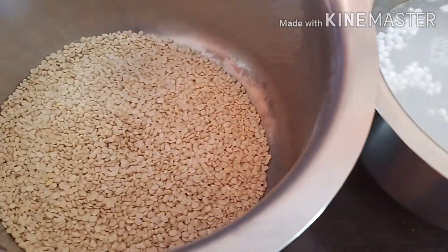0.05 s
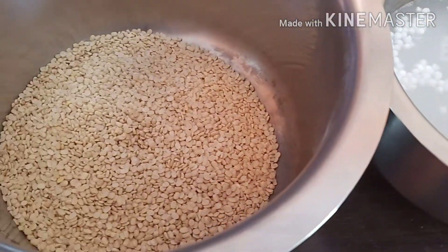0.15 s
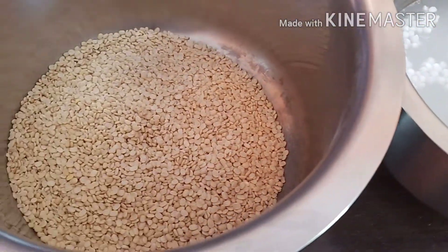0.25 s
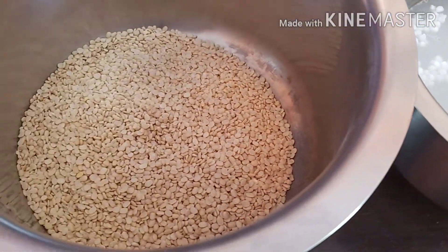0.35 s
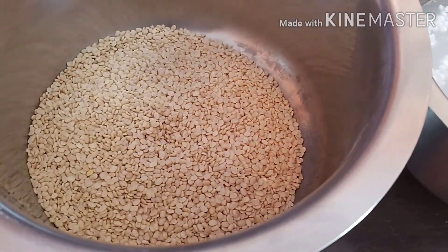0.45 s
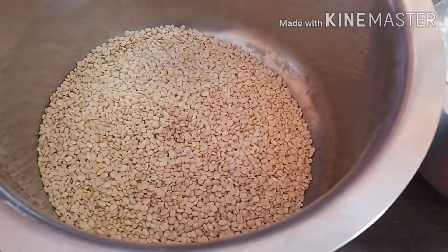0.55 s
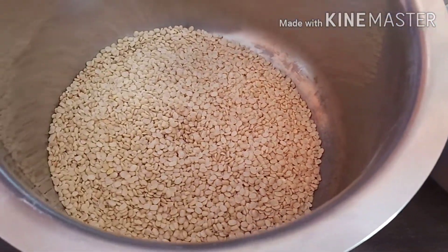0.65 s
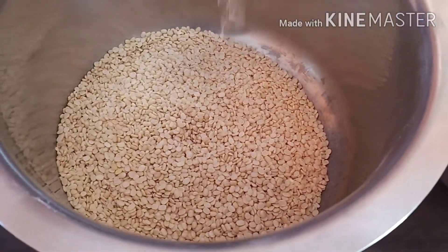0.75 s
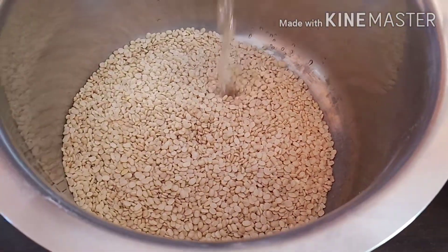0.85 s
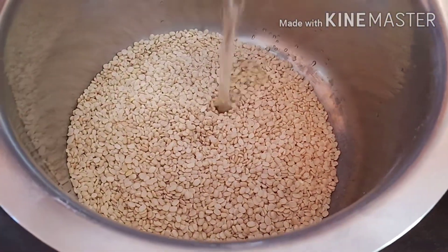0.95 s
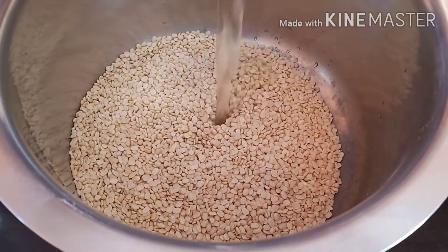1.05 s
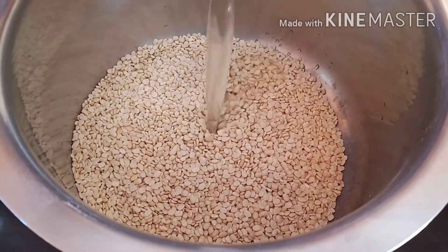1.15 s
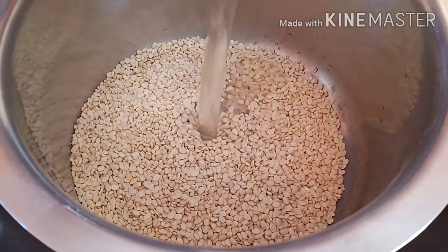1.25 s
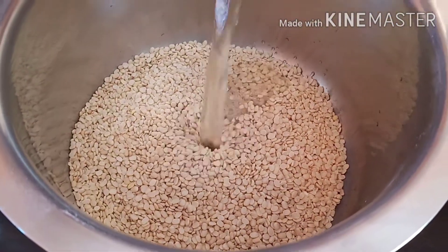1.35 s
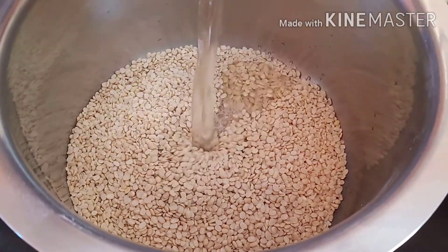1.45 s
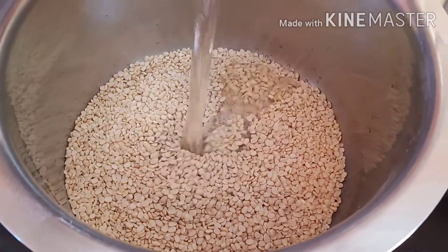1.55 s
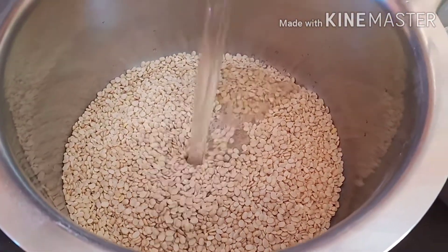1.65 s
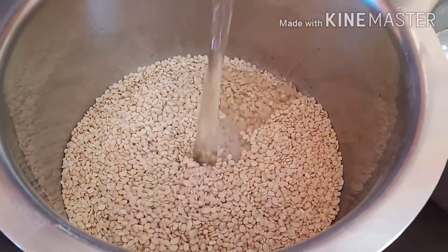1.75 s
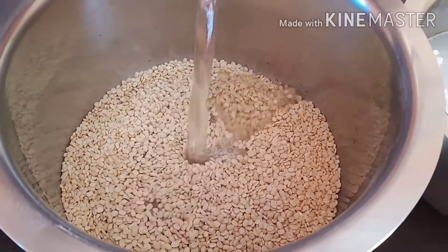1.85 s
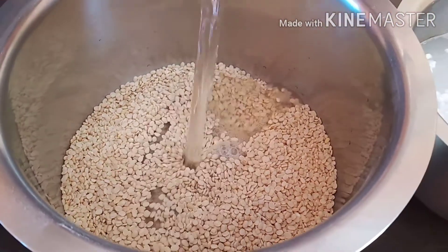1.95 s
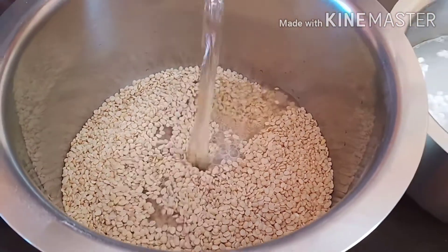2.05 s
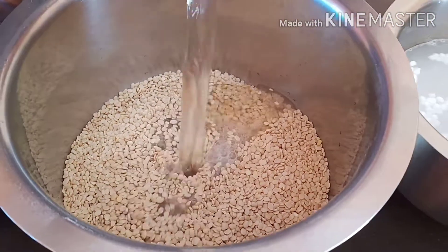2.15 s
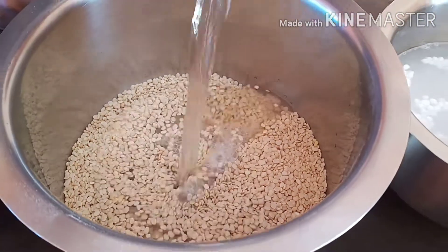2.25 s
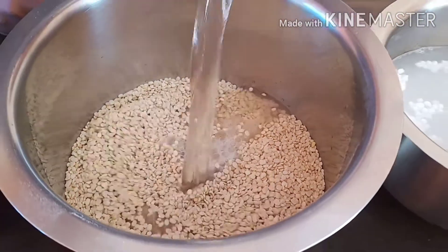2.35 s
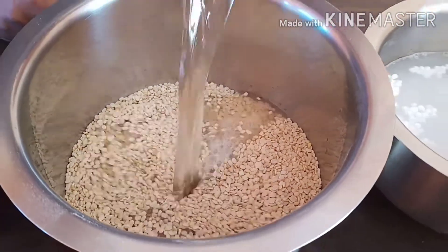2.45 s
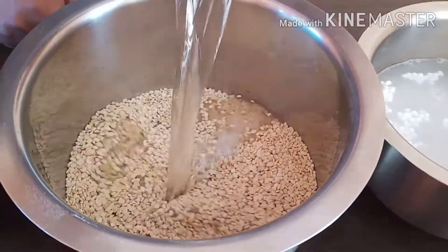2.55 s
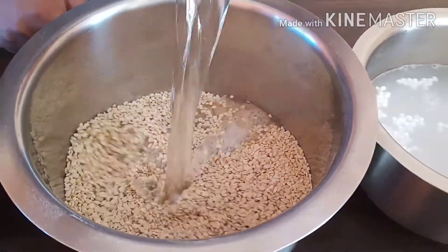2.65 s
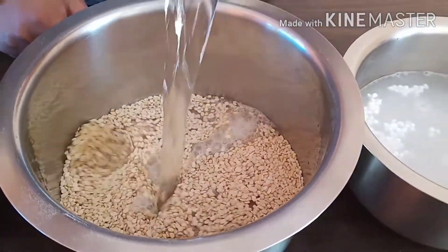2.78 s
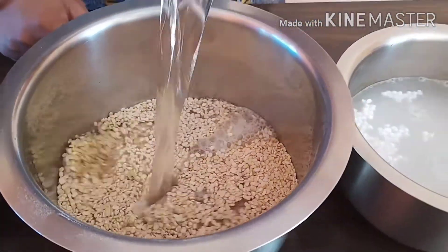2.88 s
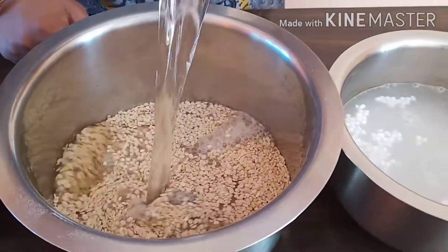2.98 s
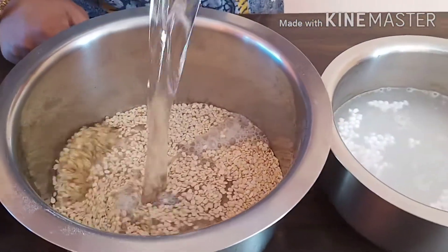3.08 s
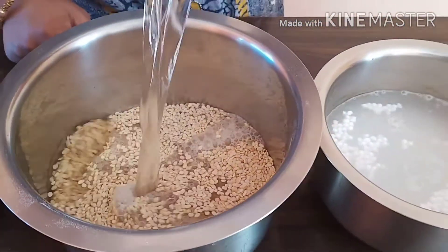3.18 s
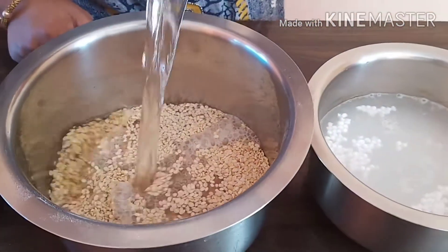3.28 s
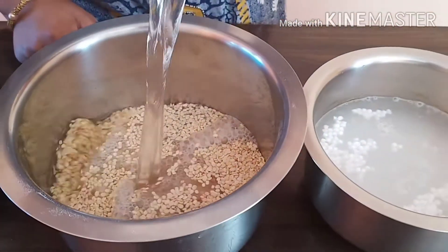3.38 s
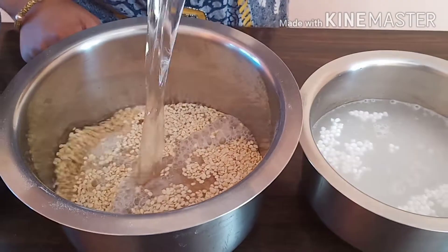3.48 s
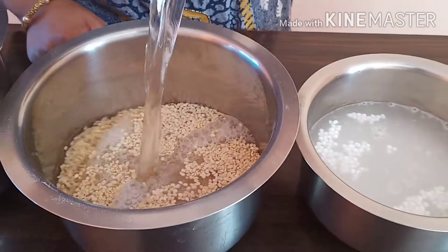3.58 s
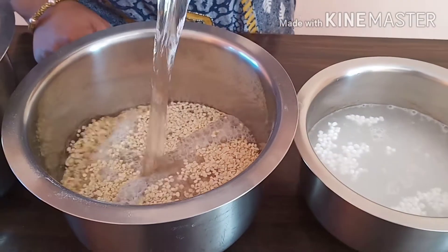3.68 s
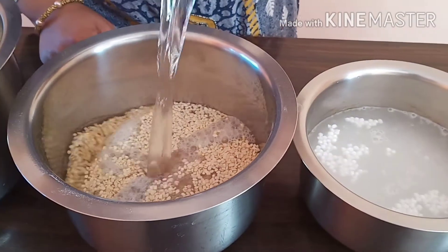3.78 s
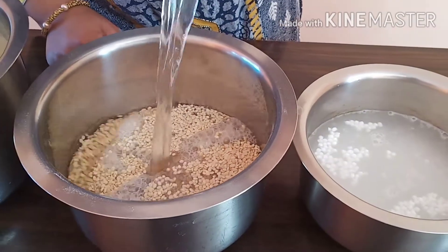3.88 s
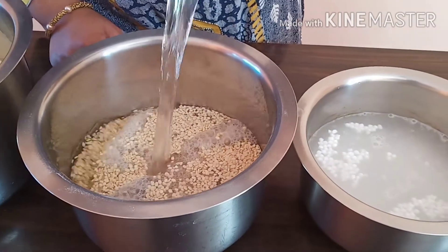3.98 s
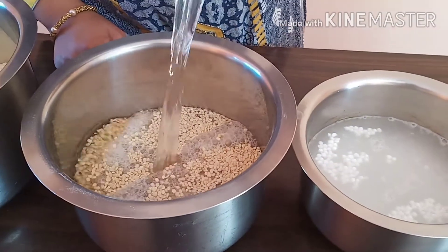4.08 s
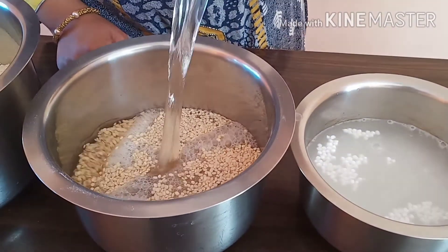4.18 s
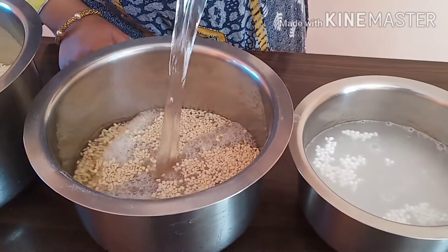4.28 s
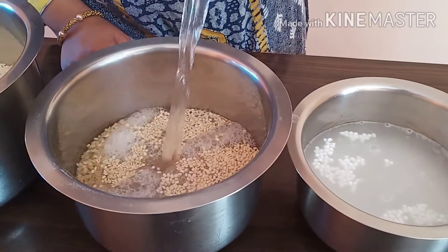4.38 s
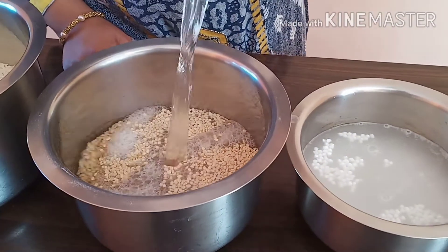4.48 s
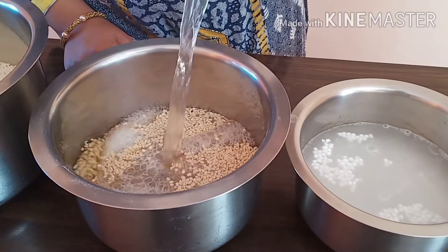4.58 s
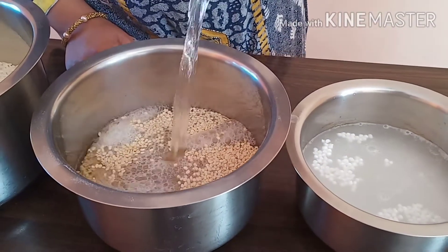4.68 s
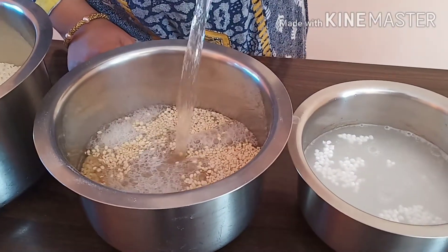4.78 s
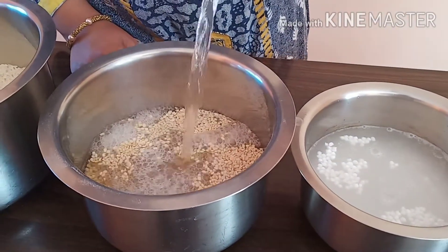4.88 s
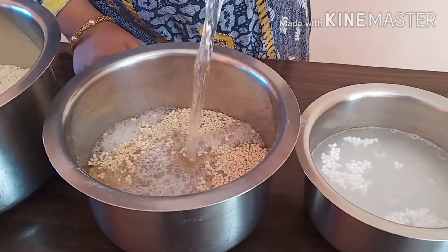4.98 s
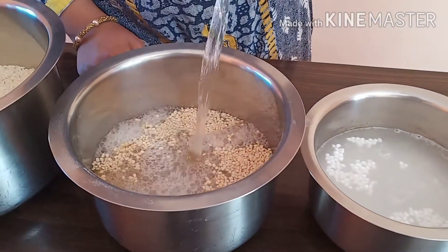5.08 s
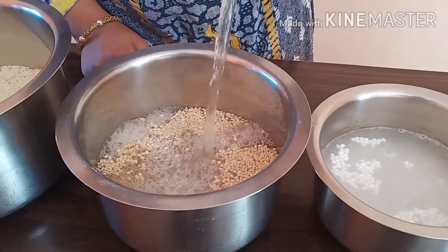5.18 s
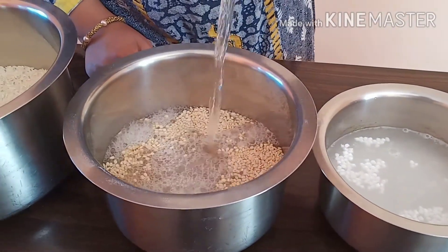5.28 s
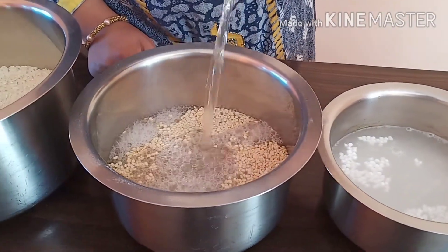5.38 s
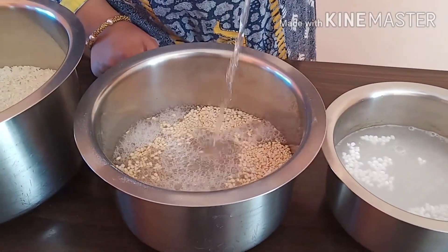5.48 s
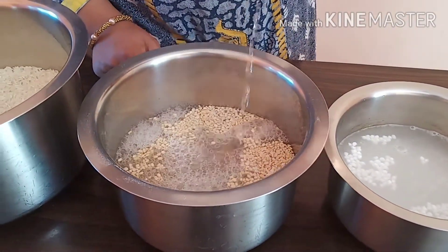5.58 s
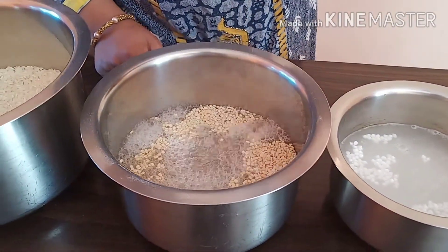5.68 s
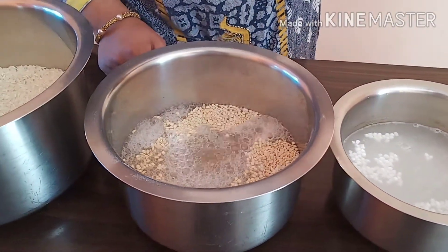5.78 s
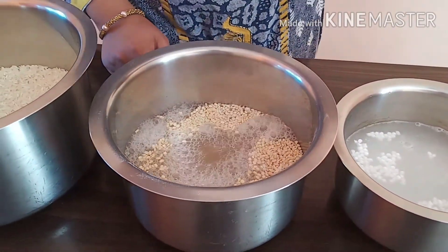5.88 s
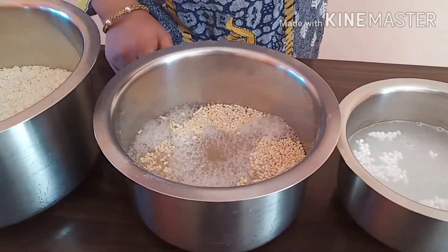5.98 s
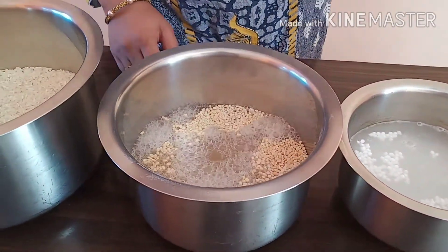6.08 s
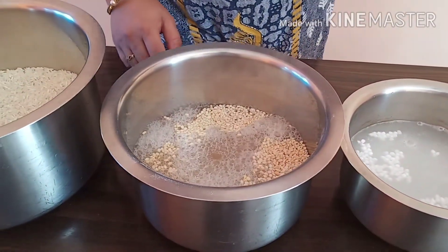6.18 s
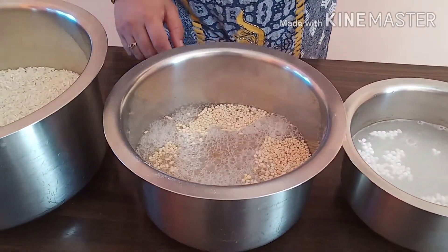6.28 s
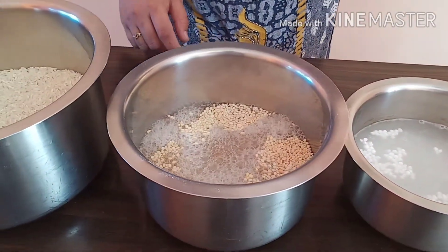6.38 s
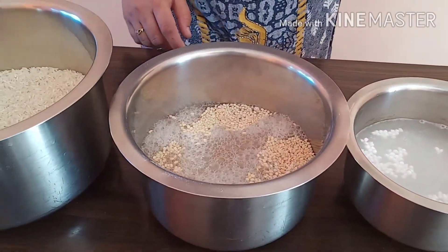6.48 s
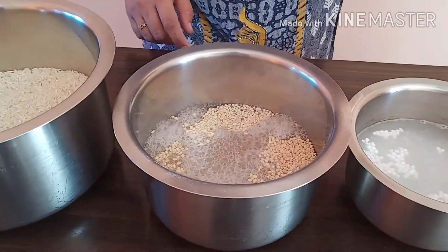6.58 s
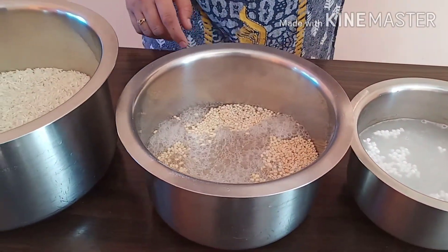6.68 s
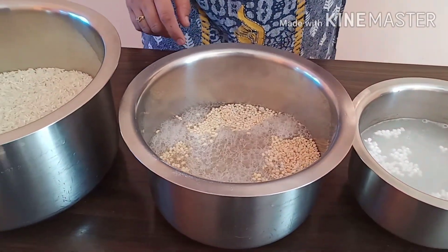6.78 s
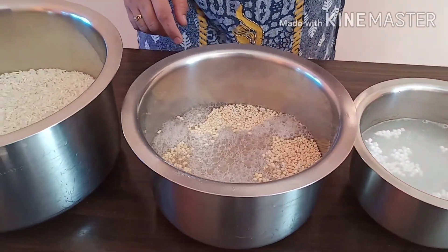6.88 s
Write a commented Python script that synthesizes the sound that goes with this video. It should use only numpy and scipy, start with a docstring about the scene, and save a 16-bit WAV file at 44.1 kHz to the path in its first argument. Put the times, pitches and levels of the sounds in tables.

```python
"""The first drops spatter and rattle dry lentils, then a stream of water hisses and rings the air in the pot.
As a pool forms the hiss softens and bubbles gurgle; the stream thins and breaks, and the wet lentils tick.
The steel pot is heard in close stereo in a quiet kitchen. Spray, splash and rattle are random impacts with wall
echoes, bubbles are damped tones that glide up, the pot's air and pockets are knocked resonances of moving
pitch, drops are short noise cracks, and the kitchen is a wavering hiss with a short reverberation."""
import sys
import numpy as np
from scipy import signal
from scipy.fft import rfft, irfft, next_fast_len
from scipy.io import wavfile
from scipy.ndimage import uniform_filter1d, map_coordinates

SR = 44100
rng = np.random.default_rng(int(sys.argv[2]) if len(sys.argv) > 2 else 0)


def to_wav(s):
    """Save 16-bit WAV."""
    ch = np.atleast_2d(s).T  # columns
    pcm = np.round(np.clip(ch, -1, 1) * 32767)  # PCM
    wavfile.write(sys.argv[1], SR, pcm.astype(np.int16))


N = 305820
TIME = np.arange(N) / SR  # s

# the water's timeline [s]: the gate opens and is shut again
START, END = .809, 5.88
# the grains are wetted, the stream is full, the pool covers the lentils, the stream stops
WETTED_S, FULL_S, COVERED_S, STOP_S = 0.97, 1.01, 3.33, 5.672
# air pockets form once the pool is deep enough
POCKETS_S = 2.9

# glugs, where the stream drags air under:
# (time [s], length [s], level of the air in the pot [dB], level of the air pockets [dB])
GLUGS = [(1.053, .06, -49, -73), (1.6, .13, -48, -71), (2.252, 0.045, -48, -59), (2.796, .17, -44, -67),
         (3.071, .04, -48, -58.5), (3.367, .05, -46, -57.5), (3.57, .13, -52, -52),
         (4.041, .05, -49.5, -52.5), (4.806, .06, -45.5, -56.5), (5.132, .04, -48, -64),
         (5.32, .06, -41.5, -53.5), (5.46, 0.21, -47, -53)]


def amp(db):
    """Decibels to gain."""
    return 10 ** (np.asarray(db) / 20)


def unit(x):
    """Scale to an rms of 1."""
    return x / np.sqrt(np.mean(x ** 2) + 1e-20)


def along(points, hz):
    """Each column of a table of frequencies, read on a log axis."""
    f, *cols = np.transpose(points)
    return np.array([np.interp(np.log(hz + 1), np.log(f + 1), c) for c in cols])


def curves(rows):
    """One value per sample for each column after the time."""
    s, *cols = np.transpose(rows)
    return [np.interp(TIME, s, c) for c in cols]


def ramp(start, length):
    """Rises from 0 to 1 over a length of time."""
    return np.clip((TIME - start) / length, 0, 1)


def since(s):
    """Seconds gone by after a moment, 0 before it."""
    return np.maximum(TIME - s, 0)


def during():
    """A gate that is open while the water runs."""
    return ramp(START, .004) * np.clip((END - TIME) / .1, 0, 1)


def wobble(rate):
    """A smooth random curve, rate knots a second."""
    knots = np.arange(0, N * rate / SR + 1, .1)
    heights = rng.standard_normal(int(N * rate / SR) + 4)
    return np.interp(TIME * rate, knots, map_coordinates(heights, [knots]))


def filtered(x, response):
    """x times a response of frequency."""
    m = next_fast_len(N + SR // 4, True)
    return irfft(rfft(x, m) * response(np.fft.rfftfreq(m, 1 / SR)), m)[..., :N]


def coloured(x, spectrum):
    """x through a causal, minimum-phase filter with the given spectrum."""
    size = 4096
    cepstrum = irfft(np.log(amp(along(spectrum, np.fft.rfftfreq(size, 1 / SR)))))
    # folding the cepstrum forward makes the response start at once
    cepstrum[:, 1:size // 2] *= 2
    cepstrum[:, size // 2 + 1:] = 0
    response = irfft(np.exp(rfft(cepstrum)))
    return signal.fftconvolve(x, response, axes=1)[:, :N]


def ports(pair):
    """Two unrelated signals become a stereo pair that is alike in the bass."""
    # (frequency [Hz], left-right likeness [0-1])
    likeness = [(100, 1), (300, 0.98), (650, 0.87), (1400, 0.079), (3000, 0.026)]

    def turn(hz):
        return np.arcsin(np.clip(along(likeness, hz), 0, 1)) / 2

    own = filtered(pair, lambda hz: np.cos(turn(hz)))
    crossed = filtered(pair[::-1], lambda hz: np.sin(turn(hz)))
    return own + crossed


def panned(db):
    """Left and right gains for a level difference; positive leans left."""
    return amp(np.array([db, -db]).reshape(2, -1) / 2)


def add(track, s, sound):
    """Mix a sound into a track at a time."""
    part = track[..., round(s * SR):][..., :sound.shape[-1]]
    part += sound[..., :part.shape[-1]]


def impacts(rate, spread_db):
    """Random impulses of uneven size, rate a second, at a steady power."""
    size = amp(spread_db * np.clip(rng.standard_normal(N), -2.5, 2.5))
    struck = rng.random(N) < rate / SR
    sign = rng.choice([-1, 1], N)
    return unit(struck * sign * size / np.sqrt(rate))


def pot(x, t60, direct):
    """Each impact reaches the ports straight and as its own blur of bounces between the steel walls."""
    keep = amp(-120 / (t60 * SR))  # per sample; it acts on power, so t60 [s] is the fall by 60 dB
    power = uniform_filter1d(signal.lfilter([1 - keep], [1, -keep], x ** 2), size=64)
    bounces = np.sqrt(np.abs(power)) * rng.standard_normal((2, N))
    return unit(np.reshape(direct, (2, 1)) * x + bounces)


def gulp(hz, cycles, rise, attack):
    """A damped tone that glides up as the bubble nears the surface; cycles until it is 60 dB down."""
    t = np.arange(int(SR * cycles / hz)) / SR
    age = t * hz / cycles
    phase = 2 * np.pi * hz * np.cumsum(1 + rise * age) / SR
    tone = np.sin(phase) * amp(-60 * age) * (1 - np.exp(-t * hz / attack))
    return tone / np.abs(tone).max()


def bubbles(centre_hz, octaves, cycles, spread_db, count):
    """A swarm of short rising notes of random size; each meets the two ports with its own strength and phase."""
    start = rng.integers(0, N, (count, 1))
    pitch, size, side, turn = np.clip(rng.standard_normal((count, 4)), -2, 2).T[..., None]
    step = np.arange(int(min(SR * cycles / centre_hz, 700)))
    age = step / SR * centre_hz * 2 ** (octaves * pitch) / cycles
    phase = 2 * np.pi * cycles * age * (1 + 0.074 * age)
    shape = amp(spread_db * size) * amp(-50 * age) * (1 - step / len(step))
    left = shape * np.cos(side) * np.sin(phase)
    right = shape * np.sin(side) * np.sin(phase + turn)
    places = (start + step).ravel()
    return unit(np.array([np.bincount(places, n.ravel(), N)[:N] for n in (left, right)]))


def resonance(hz_curve, half_width_hz, rate):
    """Random knocks ring one resonance whose pitch moves; stereo, rms 1."""
    def lowpass(hz):
        return 1 / (1 + 1.41j * hz / half_width_hz - (hz / half_width_hz) ** 2)

    knocks = np.array([impacts(rate, spread_db=3.0) for _ in range(2)])
    ring = filtered(np.vstack([knocks, rng.standard_normal((2, N))]), lowpass)
    # the slow swings are carried up to the moving pitch
    phase = 2 * np.pi * np.cumsum(hz_curve) / SR
    mid, side = ring[::2] * np.cos(phase) + ring[1::2] * np.sin(phase)
    return unit(np.array([mid + 0.25 * side, mid - 0.39 * side]))


def patchy(x, depth_db, width_hz, life):
    """Loudness drifts in random patches of frequency and time (life in s)."""
    z = signal.stft(x, nperseg=512)[2]
    field = rng.standard_normal(z.shape[1:])
    bins, frames = width_hz * 512 / SR, life * SR / 256
    for axis, steps in enumerate([bins, frames]):
        field = signal.lfilter([1], [1, -np.exp(-1 / steps)], field, axis=axis)
    return unit(signal.istft(z * amp(depth_db * unit(field)), nperseg=512)[1][:, :N])


def kitchen():
    """A background hiss whose middle band wavers."""
    # spectrum of the hiss: (frequency [Hz], left [dB], right [dB])
    room_spectrum = [(25, -50, -44), (50, -26, -28), (89, -5.5, -5.5), (400, -10, -10), (820, -16, -17.5),
                     (1090, 0.5, -2), (2420, 0.5, -12.5), (3920, -3, -16), (5180, -17, -15), (5050, -3, -8),
                     (7030, -3.5, -4), (8340, -19, -16), (9250, -51, -18.5), (11400, -30.5, -33)]
    # change of the middle band: (time [s], level [dB])
    middle_levels = [(0, -1), (.22, 1), (.7, -1), (6.05, -5.5), (6.23, -2.5), (6.42, -5.5)]
    quiet_db = -53
    hiss = unit(coloured(ports(rng.standard_normal((2, N))), room_spectrum))
    middle = filtered(hiss, lambda hz: np.exp(-(np.log((hz + 1) / 2100) / .9) ** 4))
    middle_db = curves(middle_levels)[0] + 1.3 * wobble(14)
    hiss = hiss + middle * (amp(middle_db) - 1)
    return patchy(hiss, depth_db=3.5, width_hz=88, life=0.041) * amp(quiet_db)


def walls(x, t60):
    """The kitchen's short reverberation: a decaying noise tail that starts after 8 ms."""
    t = np.arange(SR // 2) / SR
    tail = rng.standard_normal((2, len(t))) * amp(-60 * t / t60) * (t > .008)
    return ports(signal.fftconvolve(x, tail / np.linalg.norm(tail[0]), axes=1)[:, :N])


def rustles():
    """Soft swells of tiny bright clicks, before and after the pour."""
    # (time [s], level [dB], half length [s])
    swells = [(.52, -73, .025), (6.77, -61, .035)]
    swell = sum(amp(db) * np.exp(-((TIME - s) / half) ** 2) for s, db, half in swells)
    grains = pot(impacts(1500, spread_db=3), t60=.01, direct=[.5, 1])
    return swell * unit(filtered(grains, lambda hz: np.clip((hz - 6000) / 6000, 0, 1)))


def soaking():
    """Tiny bubbles between the wet lentils fizz faintly far right, from the stream's break-up onward."""
    pops = pot(impacts(400, spread_db=4), t60=.012, direct=[.5, 1])
    fizzing = unit(filtered(pops, lambda hz: np.exp(-((hz - 8750) / 1700) ** 2)))
    return fizzing * panned(-22.5) * amp(-74.5) * ramp(5.5, 0.17)


def base():
    """The pot's base drums in its modes, harder once the stream breaks into blobs; surges of water thump it."""
    # modes of the loaded base: (frequency [Hz], width [Hz], level [dB])
    base_modes = [(75, 13, 0), (124, 17, -2), (206.4, 11, 2)]
    # surges: (time [s], level [dB], starting pitch [Hz])
    surges = [(0.807, -49, 150), (0.963, -46, 119), (0.992, -40, 120), (1.0, -45, 194), (1.147, -42, 124),
              (1.854, -54, 117), (2.265, -44, 200), (3.79, -46.5, 221), (4.211, -45.5, 118),
              (5.172, -50, 80), (5.587, -46, 211)]
    smooth_db, blobs_db, fade_db_per_s = -70, 14, 200  # smooth stream; extra under blobs; after the stop
    break_s = 5.5

    def modes(hz):
        total = 0
        for k, (centre, width, db) in enumerate(base_modes):
            peak = 1j * hz * width / (centre * centre - hz * hz + 1j * hz * width)
            total = total + (-1) ** k * amp(db) * peak  # neighbours have opposite sign
        return total

    drum_db = smooth_db + blobs_db * ramp(break_s, .2) - fade_db_per_s * since(STOP_S)
    drum = unit(filtered(impacts(70, spread_db=6.5), modes)) * amp(drum_db) * during()
    for s, db, hz in surges:
        add(drum, s, amp(db - 3.5) * gulp(hz, cycles=17, rise=0.11, attack=1.2))
    return drum


def glugging():
    """Each glug swells, holds and dies away: gains of the air in the pot and of the air pockets."""
    attack_s, fall_db_per_s = 0.0097, 144

    def swell(s, length):
        return ramp(s - attack_s / 2, attack_s) * amp(-fall_db_per_s * since(s + length))

    swells = np.array([swell(s, length) for s, length, *_ in GLUGS])
    return amp([row[2:] for row in GLUGS]).T @ swells


def hollow():
    """The splashing rings the air in the pot, harder at each glug; the pitch wavers most while the pool spreads."""
    # the pitch shifts as the pool spreads: (time [s], pitch [Hz])
    air_pitch = [(2.9, 622.5), (4.05, 597.3), (4.5, 778.4), (5.15, 771), (5.4, 722.6)]
    steady_db, fade_db_per_s = -52.5, 62  # between glugs; after the stream stops
    centre_hz, = curves(air_pitch)
    # share by which the pitch wanders
    sloshing = np.interp(TIME, [2.8, 3.6, 4.4, 4.9], [0.0306, 0.0996, .1, 0.045])
    air = resonance(centre_hz * (1 + sloshing * wobble(22)), half_width_hz=43, rate=220)
    steady = amp(steady_db - fade_db_per_s * since(STOP_S)) * ramp(WETTED_S, 0.055)
    return air * np.hypot(steady, glugging()[0]) * amp(-1.5 + 0.57 * wobble(20)) * during()


def pocket_hz(s):
    """Pitch of the air pockets at a time: it sags as the pool deepens."""
    return 524.5 - 72 * (s - POCKETS_S)


def pool():
    """Churning air pockets, a few plops of random size in each glug, and single loud gulps."""
    # the loudest bubbles and early patter: (time [s], level [dB], starting pitch [Hz])
    loud_bubbles = [(0.923, -34, 1320), (0.981, -29.5, 1330), (2.255, -31.5, 586), (2.953, -31, 660),
                    (3.11, -30, 558), (3.581, -32, 637), (4.053, -34, 593), (4.078, -41, 449),
                    (4.212, -35, 619), (4.311, -36.5, 590), (4.842, -25, 760), (4.864, -40.5, 390),
                    (4.952, -33, 780), (5.07, -44, 417), (5.165, -26, 761), (5.379, -41.5, 241),
                    (5.389, -40, 335), (5.453, -32, 765), (5.525, -30, 719), (5.59, -32.5, 674),
                    (5.63, -43, 339), (5.665, -31.5, 800)]
    lag_s = .025  # a pocket rings just after the plunge
    churn = resonance(pocket_hz(TIME) * (1 + .06 * wobble(16)), half_width_hz=55, rate=170)
    steady = amp(-71.5) * ramp(POCKETS_S, 0.12)
    gulps = np.zeros(N)
    for s, length, _, db in GLUGS:
        for when, size in rng.random((3, 2)):
            # larger plops are lower
            plop = gulp(pocket_hz(s) * 2 ** (.15 - 0.33 * size), cycles=27, rise=.06, attack=1.5)
            add(gulps, s + lag_s + when * length, amp(db - 0.5) * plop)
    for s, db, hz in loud_bubbles:
        add(gulps, s, amp(db - 4.5) * gulp(hz, cycles=28.6, rise=0.039, attack=2.1))
    pockets = np.interp(TIME - lag_s, TIME, glugging()[1])
    return churn * np.hypot(steady, pockets) * during() * panned(3.0) + gulps


def fizz():
    """Middle-sized bubbles gurgle in the pool, louder as it fills and at every glug."""
    full_db, grows_db, fade_db_per_s = -50.5, 13, 130  # in the full pool; gained while it fills; after the stop
    fill_s = 2.15
    swarm = bubbles(centre_hz=1290, octaves=0.45, cycles=105, spread_db=2.0, count=3500)
    steady_db = full_db - grows_db * (1 - ramp(FULL_S, fill_s)) - fade_db_per_s * since(STOP_S)
    gain = np.hypot(amp(steady_db), amp(0.5) * glugging()[1])
    return unit(ports(swarm)) * gain * amp(1.7 * wobble(9)) * during()


def pouring():
    """Levels of spray and splash: a trickle builds to the full stream, then a quick fade, spray first."""
    # the steady stream: (time [s], spray level [dB], splash level [dB])
    stream_levels = [(1.07, -28, -35), (1.24, -27.5, -36), (1.35, -26.5, -33), (2.36, -28, -34.5),
                     (2.48, -30, -33.5), (2.58, -28.5, -32), (3.04, -31.5, -33.5), (3.36, -30, -33.5),
                     (3.53, -38, -36.5), (4.59, -38, -41), (5.4, -45, -43.5), (5.44, -46, -45)]
    trickle_spray_db, trickle_splash_db = -8.5, -11  # the first trickle against the full stream
    spray_fade, splash_fade = 230, 106  # dB per s after the stream stops
    spray_db, splash_db = curves(stream_levels)
    spray_db = spray_db + trickle_spray_db * (1 - ramp(WETTED_S, 0.043)) - spray_fade * since(STOP_S)
    splash_db = splash_db + trickle_splash_db * (1 - ramp(START, 0.16)) - splash_fade * since(STOP_S)
    return spray_db, splash_db


def plinks():
    """Small bubbles ring out singly in the open pool."""
    swarm = bubbles(centre_hz=2362, octaves=0.248, cycles=92, spread_db=4, count=700)
    level_db = pouring()[1] - 6
    return swarm * amp(level_db) * ramp(COVERED_S, .4) * during()


def rattle():
    """Dry lentils click against each other in a narrow bright band, ever louder until they are wetted."""
    centre_hz, width_hz = 7600, 1400
    peak_db, rise_db_per_s, fall_db_per_s = -23, 85, 400

    def band(hz):
        return (1j * hz * width_hz / (centre_hz ** 2 - hz ** 2 + 1j * hz * width_hz)) ** 2

    grains = unit(filtered(pot(impacts(1700, spread_db=9), t60=0.032, direct=[.3, 1]), band))
    level_db = peak_db - rise_db_per_s * np.maximum(WETTED_S - TIME, 0) - fall_db_per_s * since(WETTED_S)
    return grains * amp(level_db) * panned(-5) * during()


def clicks(rows, t60, gain_db):
    """Sharp little noise cracks with a short rattle of wall echoes."""
    # a drop's crack: (frequency [Hz], left [dB], right [dB])
    crack_spectrum = [(304,-31,-44.5), (1510,-39,-39), (4230,-15,-9), (5500,-14,-22), (7200,-7,3.5),
                      (10000,-16,-6.5), (11900,-22,-12.5), (15100,-13,-11)]
    track, t = np.zeros((2, N)), np.arange(SR // 25) / SR
    shape = amp(-60 * t / t60) + amp(-22 - 60 * t / 0.043)  # crack, then echoes
    for s, db, pan_db in rows:
        noise = rng.standard_normal((2, len(t)))
        add(track, s, amp(db + gain_db) * panned(pan_db) * shape * noise)
    return coloured(track, crack_spectrum)


def spatter(count):
    """Stray drops of random strength and place, all through the full stream."""
    when, strength, place = rng.random((count, 3)).T
    times = FULL_S + when * (STOP_S - FULL_S)
    level_db = np.interp(times, [FULL_S, STOP_S], [-19, -24]) - 9 * strength
    return clicks(zip(times, level_db, -12 * place), t60=0.0067, gain_db=2)


def drops():
    """Loud drops smack on lentils and steel, lentils tick as they shift and settle, stray drops spatter."""
    # the loudest drops: (time [s], level [dB], left-right [dB])
    smacks = [(0.8213, -14.5, -18.5), (0.8368, -16, -16), (0.8438, -18.5, -13), (0.8656, -8, -17),
              (0.873, -13, -8.5), (0.887, -16.5, -19), (0.9052, -10.5, -6), (0.92, -10, -12),
              (0.9615, -19, -12), (1.1668, -6, 5), (3.2172, -6, 1), (3.3426, -11.5, -7), (3.7294, -19, -13),
              (3.7957, -18, -4), (3.9784, -19, -11), (4.1998, -12, -2.5), (4.2065, -19, -9),
              (4.4149, -18, 1), (4.7793, -20.5, -11), (4.951, -21.5, -16), (5.4887, -14, 2),
              (5.5253, -11, 6), (5.608, -12, 0.5)]
    # lentils shifting and settling: (time [s], level [dB], left-right [dB])
    settling = [(0.5015,-40,-4), (0.5225,-45,-12), (6.5834,-56,-3), (6.7096,-44,-3), (6.7574,-36,2),
                (6.848,-54,-11)]
    loud = clicks(smacks, t60=0.0096, gain_db=3.5)
    return loud + clicks(settling, t60=0.013, gain_db=4) + spatter(count=30)


def cushioned(x, above_hz, loss_db):
    """The treble drops as the pool spreads over the lentils and cushions the stream."""
    treble = filtered(x, lambda hz: 1 - 1 / (1 + (hz / above_hz) ** 8))
    return x + treble * (amp(loss_db * ramp(COVERED_S, 0.54)) - 1)


def stream():
    """Fine spray and bursting foam; a weaker stream gives fewer, more distinct impacts."""
    # spectra at the two microphone ports: (frequency [Hz], left [dB], right [dB])
    spray_spectrum = [(3900, -63, -81), (5530, -4, -44), (6150, -7.5, -8.5), (7020, 0, -2), (7880, -8, 2),
                      (8560, -3, -9), (9360, -14, 3.5), (10200, -3, -6), (11150, -10, -6), (14250, 1, -10),
                      (13600, -17, -1), (15300, -17, -3.5)]
    splash_spectrum = [(450, -55.5, -49), (970, -28.5, -22.5), (1308, -28.5, -21.5), (1266, -7.5, -4.5),
                       (1580, -15, -19.5), (2230, 0, -2), (2700, -2, -5), (4060, 0, -4), (4260, -1, -0.5),
                       (5440, -11.5, -7), (8400, -30, -34.5)]
    spray_db, splash_db = pouring()
    # the spray starts on the right and drifts leftward; the first trickle lands further right
    pan_db = -3.5 + 1.05 * since(FULL_S) - 1 * (1 - ramp(WETTED_S, 0.056))
    flow = np.clip(amp(spray_db - spray_db.max()), .05, 1)
    flutter = wobble(45)
    spray = pot(impacts(500 + 8000 * flow, spread_db=6), t60=0.022, direct=[.3, 1.1])
    spray = spray + 0.28 * bubbles(centre_hz=8930, octaves=0.356, cycles=180, spread_db=2.0, count=4500)
    splash = pot(impacts(1400 + 9000 * flow, spread_db=3.5), t60=0.088, direct=[.3, -.3])
    splash = splash + 0.22 * bubbles(centre_hz=2614, octaves=0.404, cycles=130, spread_db=1.5, count=3000)
    # loudness drifts in random patches of frequency and time
    spray = patchy(coloured(spray, spray_spectrum), depth_db=2.0, width_hz=160, life=0.016)
    splash = patchy(coloured(splash, splash_spectrum), depth_db=2.0, width_hz=130, life=0.024)
    spray = spray * amp(spray_db + 3.5 + 0.39 * flutter + 0.58 * wobble(9)) * panned(pan_db)
    splash = splash * amp(splash_db + 2.07 + .5 * flutter + 0.31 * wobble(6.5))
    soft_spray = cushioned(spray, above_hz=9600, loss_db=-3)
    soft_splash = cushioned(splash, above_hz=3900, loss_db=-2)
    return (soft_spray + soft_splash) * during()


def scene():
    """All the sounds of the pot, reverberated, over the kitchen's hiss."""
    left_lag = 0.00011  # s; the pot stands a little to the right
    faint = rustles() + soaking()
    pooled = base() + hollow() + pool() + fizz() + plinks()
    water = faint + pooled + rattle() + drops() + stream()
    water = filtered(water, lambda hz: np.exp(-2j * np.pi * hz * np.array([[left_lag], [0]])))
    return water + amp(-7.5) * walls(water, t60=0.22) + kitchen()


def record(dry):
    """Nothing is kept above the band limit."""
    top_hz = 15700
    return filtered(dry, lambda hz: np.clip((top_hz - hz) / 200, 0, 1) ** 2)


dry = scene()
out = record(dry)
to_wav(out)
```